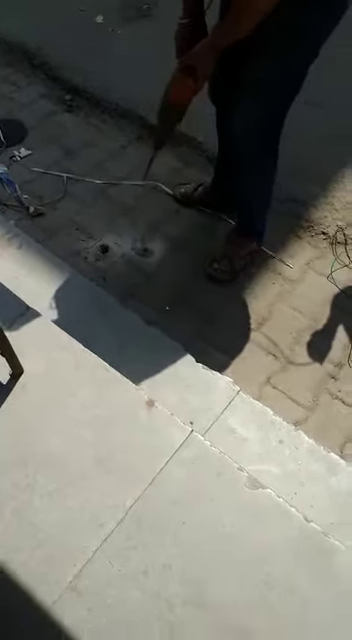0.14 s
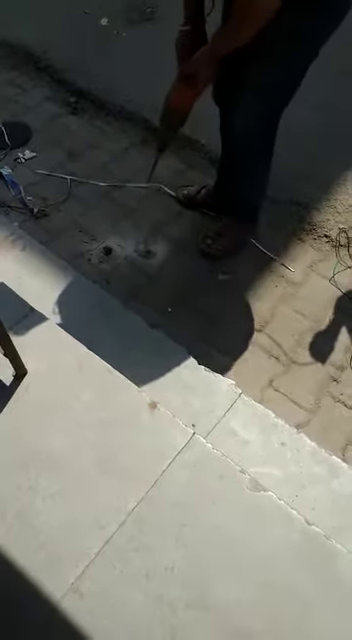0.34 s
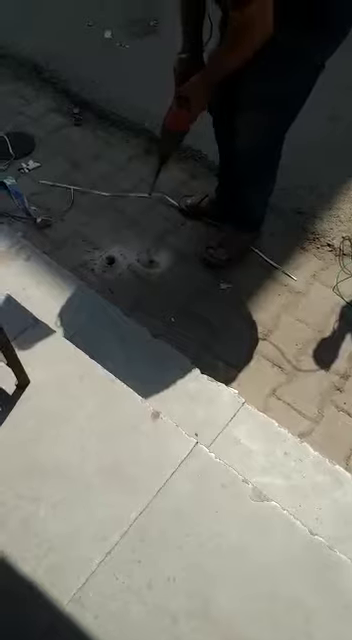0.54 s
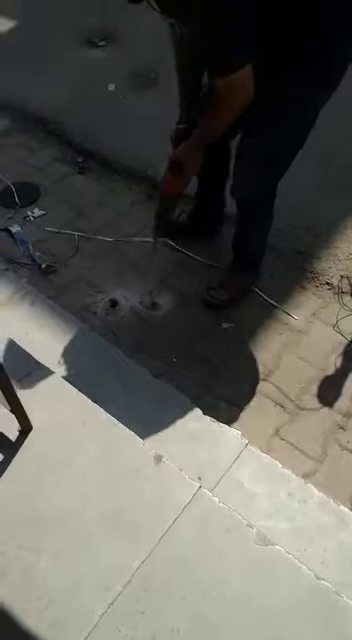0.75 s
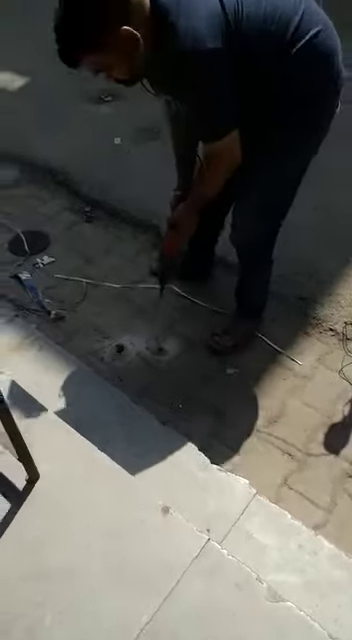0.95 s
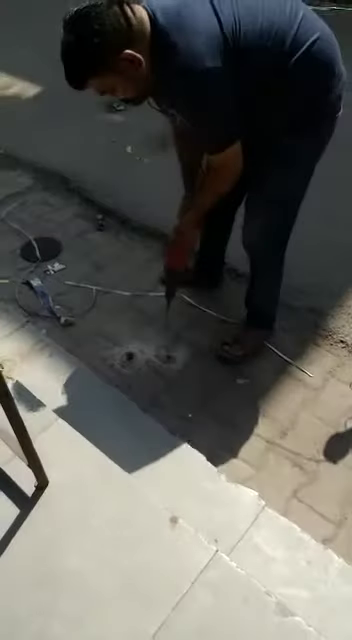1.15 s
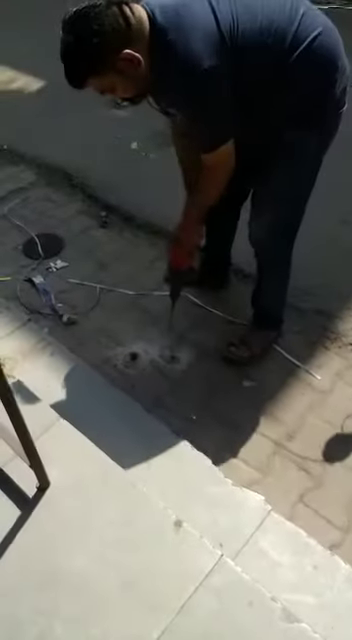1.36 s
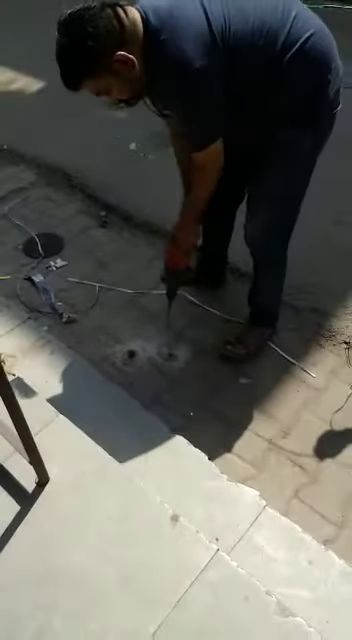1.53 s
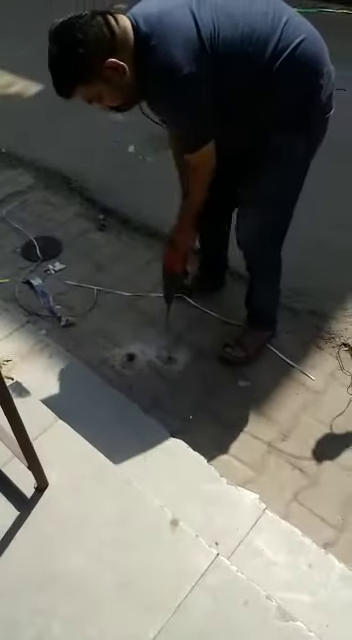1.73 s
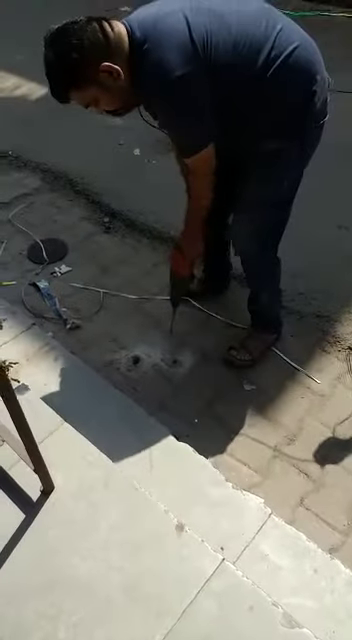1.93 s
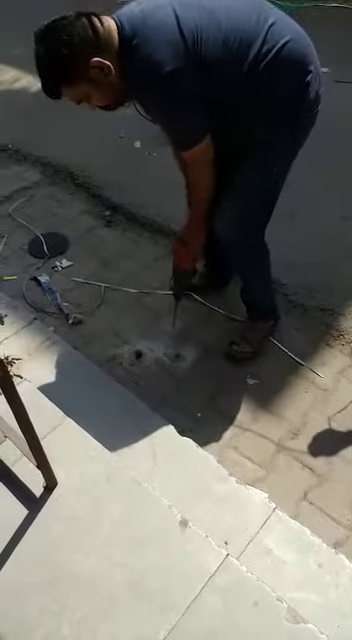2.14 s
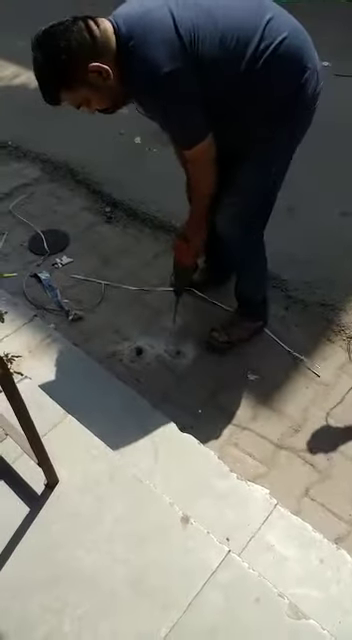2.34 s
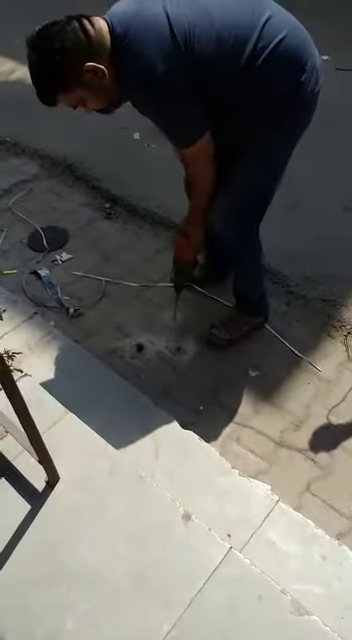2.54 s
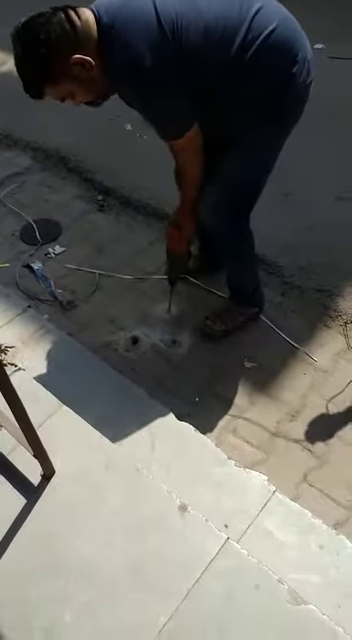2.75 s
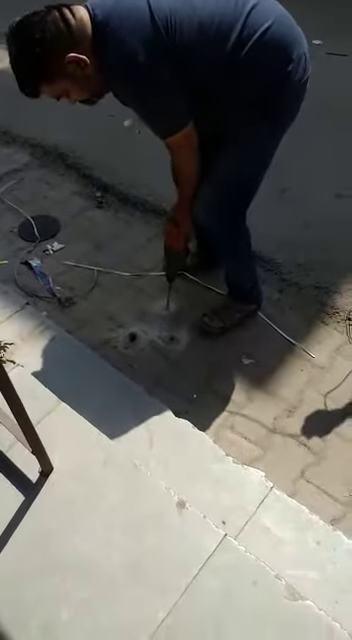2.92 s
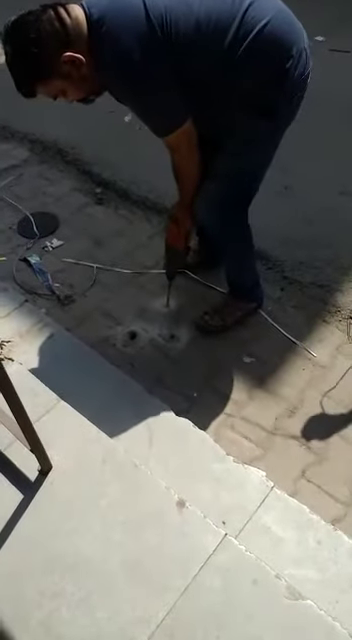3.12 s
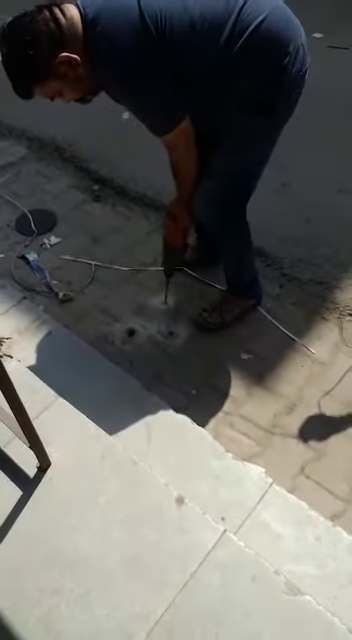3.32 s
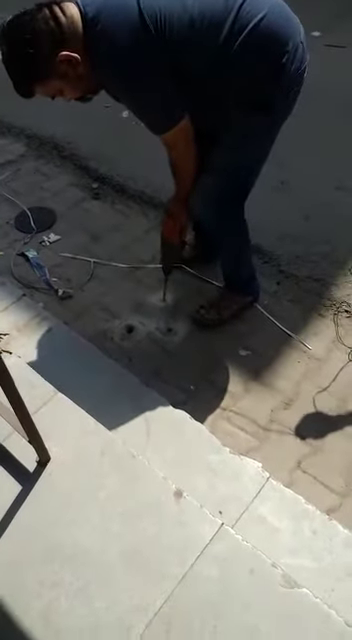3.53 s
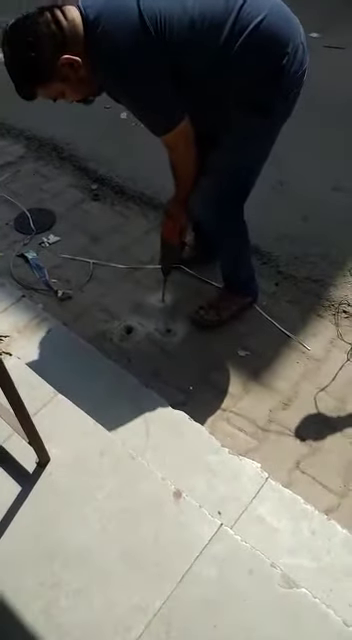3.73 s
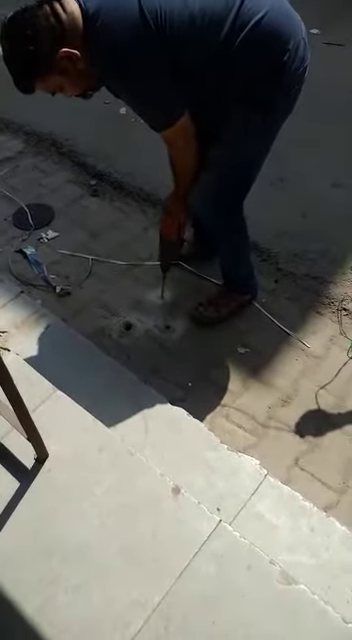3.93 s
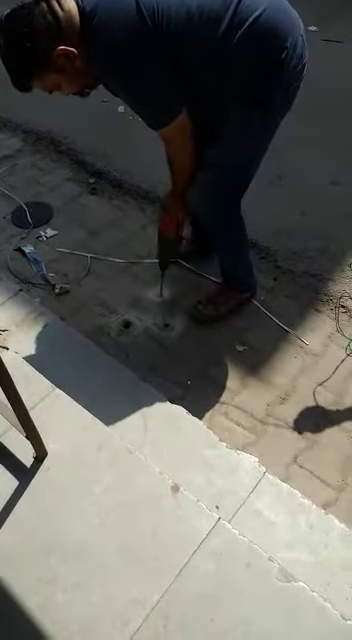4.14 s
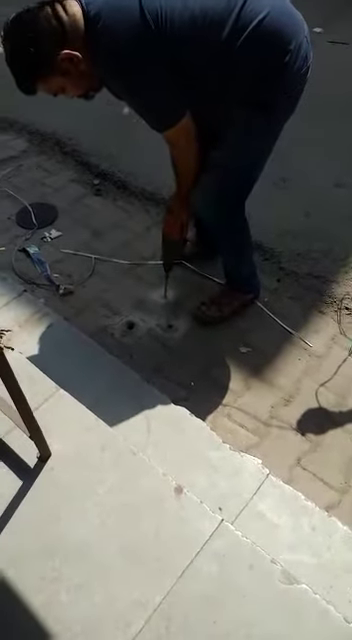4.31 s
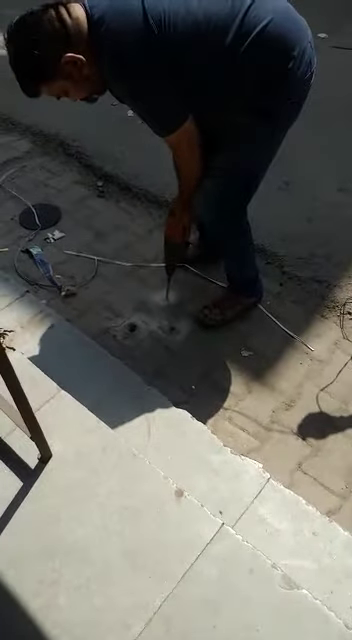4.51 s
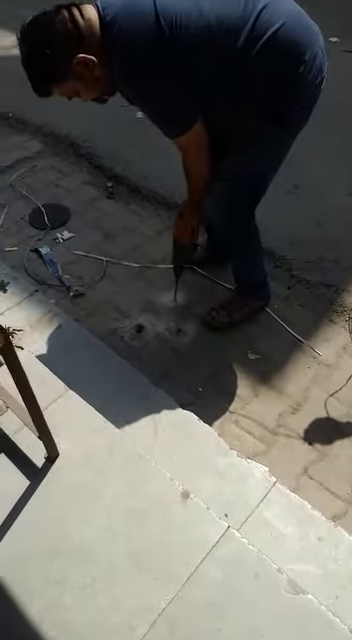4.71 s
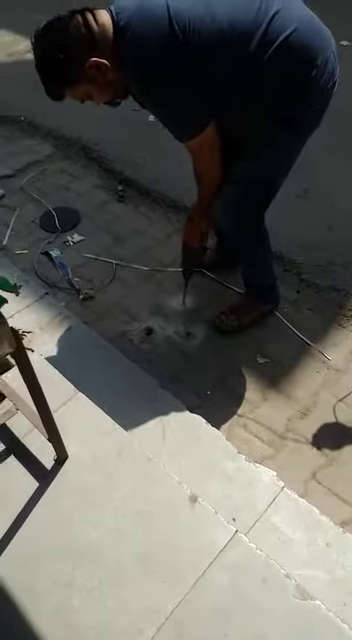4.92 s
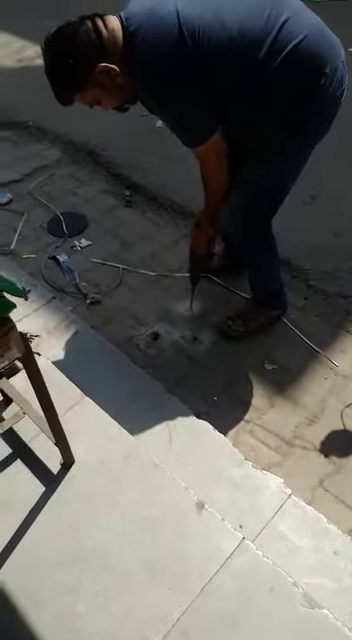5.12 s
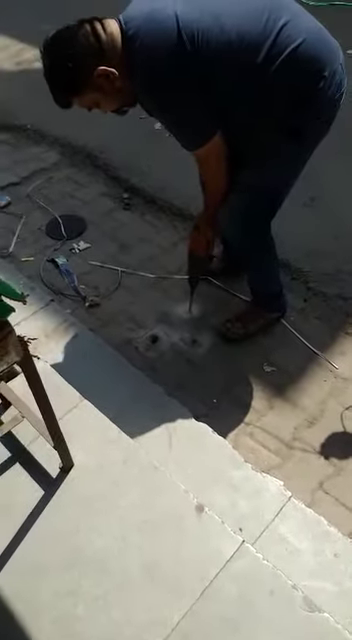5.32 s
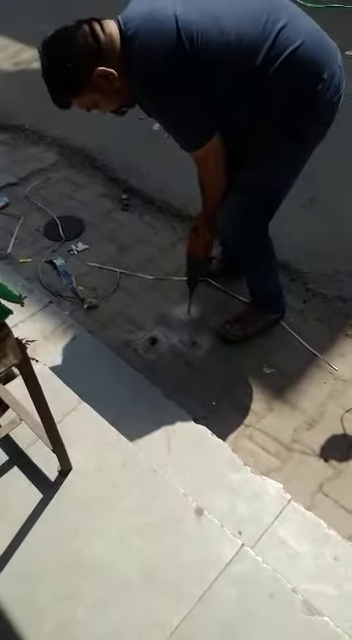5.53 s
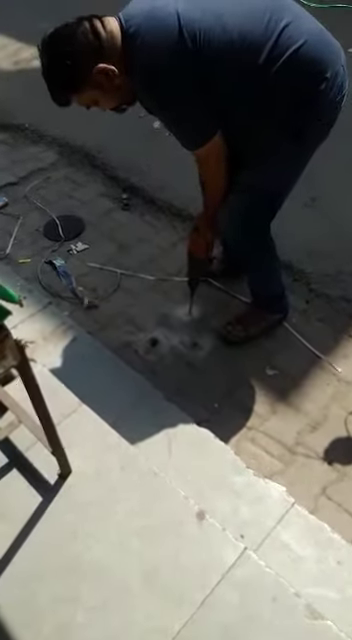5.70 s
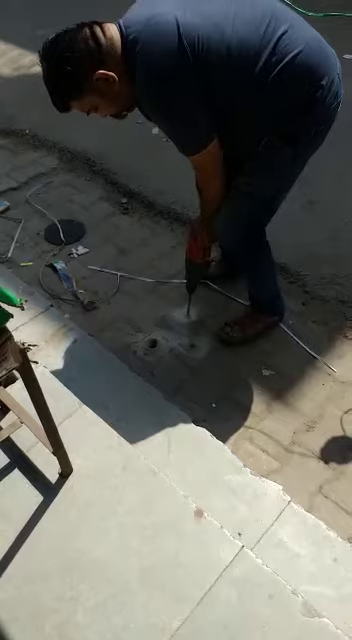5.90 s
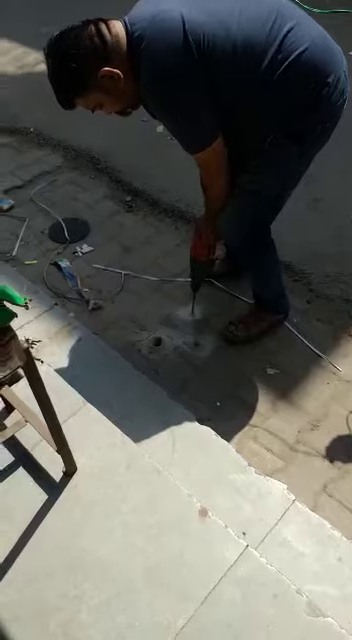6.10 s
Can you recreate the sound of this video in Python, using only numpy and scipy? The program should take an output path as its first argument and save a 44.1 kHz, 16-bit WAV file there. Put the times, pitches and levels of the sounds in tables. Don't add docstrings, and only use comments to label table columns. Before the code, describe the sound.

A loud rotary hammer winds down over about a second, its loose steel bit rattling brightly. Distant traffic hum swells in the lull. The bit clicks and scrapes on concrete, the motor surges with a sharp knock, then hammers in a fast, unbroken buzz with gear whine, low thumps and spitting chips. Outdoors beside a wall, phone a few metres away, its gain ducking the street under the tool.

```python
import sys
import numpy as np
from scipy import signal
from scipy.fft import rfft, irfft
from scipy.io import wavfile
from scipy.ndimage import uniform_filter1d

SR = 44100
rng = np.random.default_rng(int(sys.argv[2]) if len(sys.argv) > 2 else 0)


def unload_audio(sound):
    columns = np.transpose(np.atleast_2d(sound))
    steps = np.round(np.clip(columns, -1, 1) * 32767)
    wavfile.write(sys.argv[1], SR, steps.astype(np.int16))


def voltage_ratio(level):
    return 10 ** (np.asarray(level, float) / 20)


N = 276045
TIME = np.arange(N) / SR
TEETH = 21
PRESS_S, EASE_S, DEEP_S, CHANGE_S = 1.71, 3.5, 4.77, 0.12


def noise():
    return rng.standard_normal(N)


def shaped(x, spectrum):
    hz, level_db = np.transpose(spectrum)
    bins = np.arange(N // 2 + 1) * SR / N + 1
    gain = voltage_ratio(np.interp(np.log(bins), np.log(hz), level_db))
    y = irfft(rfft(x) * gain, N)
    return y / np.std(y)


def band(x, lo_hz, hi_hz):
    edges = [lo_hz, min(hi_hz, 0.45 * SR)]
    return signal.sosfilt(signal.butter(2, edges, "bandpass", fs=SR, output="sos"), x)


def resonate(envelope, modes):
    total = 0
    for hz, width_hz, level_db in modes:
        peak = signal.iirpeak(hz, hz / width_hz / 1.5, fs=SR)
        ring = signal.lfilter(*peak, signal.lfilter(*peak, envelope * noise()))
        total = total + voltage_ratio(level_db) * ring / np.std(ring)
    return total


def walk(rate_hz):
    hold = int(SR / rate_hz)
    levels = np.repeat(rng.standard_normal(N // hold + 1), hold)
    return uniform_filter1d(uniform_filter1d(levels, hold), hold)[:N]


def rise(at_s, over_s):
    return np.clip((TIME - at_s) / max(over_s, 0.001) + 0.5, 0, 1)


def curve(table):
    return np.interp(TIME, *np.transpose(table))


def bursts(turns, at, decay, scatter_db, jitter):
    chance = np.clip(rng.standard_normal((N // 400, 2)), -2, 2)
    turn = np.floor(turns - at).astype(int) + 1
    since = (turns - at) % 1 - jitter * np.abs(chance[turn, 0])
    size = voltage_ratio(np.clip(scatter_db, 0, 6) * chance[turn, 1])
    shape = np.where(since > 0, np.exp(-np.abs(since) / decay), 0) * size
    return shape / np.sqrt(np.mean(shape ** 2))


def orders(turns, lines, flicker_db, slip):
    total = 0
    for multiple, level_db in lines:
        phase = multiple * turns + rng.random() + slip * walk(20)
        total = total + voltage_ratio(level_db + flicker_db * walk(14)) * np.sin(2 * np.pi * phase)
    return np.sqrt(2) * total


# start_s, level_db
MOTOR_LEVEL = [(0, -19), (.16, -22), (.4, -26), (.45, -29.5), (.6, -30), (.82, -34.5), (1.27, -44),
               (1.41, -48), (1.47, -33), (1.54, -25), (1.63, -18), (1.7, -14), (1.97, -16.5), (2.8, -19),
               (4.6, -19), (4.96, -21), (5.9, -20.5), (6.26, -18.5)]


def motor_level():
    return curve(MOTOR_LEVEL)


# start_s, pitch_hz (second gear-mesh harmonic)
MOTOR_SPEED = [(1.85, 2510), (1.93, 2633), (2.09, 2769), (2.3, 2765), (2.64, 2752), (2.81, 2728),
               (2.98, 2686), (3.32, 2674), (3.66, 2762), (3.83, 2739), (4.0, 2753), (4.51, 2701),
               (4.68, 2706), (5.02, 2677), (5.36, 2661), (5.53, 2656), (5.7, 2640), (6.04, 2662)]


def motor_speed():
    return curve(MOTOR_SPEED)


# pitch_hz, level_db (per Hz)
ROAR_COLOUR = [(120, -37), (200, -14), (360, -24), (640, -14), (850, -9), (1340, -2.5), (2770, 1.5),
               (3800, 0.5), (5350, 6.5), (6600, -3.5), (8300, -20), (9800, -23), (12500, -11),
               (15700, -12.5)]
# pitch_hz, width_hz, level_db
HOUSING_MODES = [(1386, 56, -12), (2780, 370, -5), (4390, 82, -10.5), (1981, 30, -14)]


def roar(turns, share, motor_db):
    idle_db = np.maximum(0.5 + 0.3 * (motor_db + 18.5), -8.5)
    presence_db = idle_db + (3.0 - idle_db) * rise(1.7, 0.15)
    puff = share * bursts(turns, at=0.05, decay=0.14, scatter_db=1.5, jitter=0.05)
    fan = shaped(noise(), ROAR_COLOUR)
    brushes = shaped(noise(), ROAR_COLOUR)
    unit = np.std(band(fan, 1500, 2400))
    low = band(fan, 72, 2600) * voltage_ratio(0.84 * walk(12)) * np.sqrt(1 + 0.5 * puff ** 2)
    high = band(brushes, 4260, 19000) * voltage_ratio(presence_db - 6.5 + 1.02 * walk(8.1))
    high = high * np.sqrt(1 + 0.21 * puff ** 2)
    bottom = signal.butter(4, 1400, fs=SR, output="sos")
    treble = signal.butter(4, 11000, "highpass", fs=SR, output="sos")
    low = low - 0.47 * (1 - share) * signal.sosfiltfilt(bottom, low)
    high = high - 0.4 * (1 - share) * signal.sosfiltfilt(treble, high)
    housing = resonate(np.sqrt(1 + 0.22 * puff ** 2), HOUSING_MODES) * share * voltage_ratio(1.8 * walk(4.7))
    return voltage_ratio(motor_db - 3.0) * ((low + high) / unit + housing)


# start_s, level_db, length_s
BIT_JOLTS = [(0, -48, .06), (0.183, -43, .03), (.28, -51, .03), (0.368, -51, 0.027), (.47, -54, 0.028),
             (.53, -47, .02), (1.28, -48, .02), (1.31, -53, .03), (1.335, -56, .02), (2.845, -29, .015),
             (4.21, -36, .02), (4.679, -36, 0.029)]


def ring_gain(motor_db):
    rattle = voltage_ratio(-51 - 10 * TIME) * (1 - rise(0.56, 0.02))
    jolts = 0
    for start_s, level_db, length_s in BIT_JOLTS:
        jolts = jolts + voltage_ratio(level_db) * rise(start_s, 0.003) * np.exp(-np.abs(TIME - start_s) / length_s)
    blows = voltage_ratio(-28 - 3.6 * (TIME - PRESS_S) + 1.6 * walk(7.5)) * rise(PRESS_S, 0.04)
    return voltage_ratio(motor_db - 52) + rattle + jolts + blows


def freedom_db():
    free_db, held_db, eased_db = 4.5, -5.5, 0.1
    eased = rise(EASE_S, CHANGE_S) - rise(DEEP_S, CHANGE_S)
    return free_db + (held_db - free_db) * rise(PRESS_S, CHANGE_S) + (eased_db - held_db) * eased


# pitch_hz, width_hz, level_db
BIT_MODES = [(13230, 280, 0), (12700, 350, -8), (9020, 140, -12)]
# pitch_hz, width_hz, level_db
SHANK_MODES = [(13080, 650, 1), (15000, 2400, -2), (5560, 450, 8)]


def bit(turns, share, motor_db):
    blow = bursts(turns, at=0.1, decay=0.13, scatter_db=4.0, jitter=0.06)
    rebound = bursts(turns, at=0.6, decay=0.13, scatter_db=4.5, jitter=0.1)
    grit = 0.55 * voltage_ratio(2.5 * walk(150))
    knocks = blow + 0.6 * rebound + grit
    ringing = resonate(knocks, BIT_MODES) * voltage_ratio(freedom_db()) + share * resonate(knocks, SHANK_MODES)
    return voltage_ratio(1.0) * ring_gain(motor_db) * ringing


def ducked_db(motor_db):
    keep = np.exp(-1 / (0.9 * SR))
    push_db = 0.48 * np.maximum(motor_db + 39.5, 0)
    duck_db = signal.lfilter([1 - keep], [1, -keep], push_db, zi=[3.5])[0]
    return -36.5 - duck_db - 0.7 * np.maximum(TIME - PRESS_S, 0)


# pitch_hz, level_db (per Hz)
STREET_COLOUR = [(24, -33), (40, -6.5), (140, 0.5), (318, -10), (389, -6), (512, -10.5), (566, -7),
                 (844, -6.5), (909, -13.5), (1140, -7), (2940, -17.5), (5100, -18), (6230, -19),
                 (8620, -47), (15700, -61)]


def street(motor_db):
    hum = shaped(noise(), STREET_COLOUR) * voltage_ratio(0.21 * walk(4.7))
    return voltage_ratio(ducked_db(motor_db)) * hum / np.std(band(hum, 50, 170))


# start_s, level_db (peak), pitch_hz (centre), width_hz, decay_s
TIP_TICKS = [
    (.891, -30, 14000, 8000, 0.0025),
    (1.639, -4, 4870, 1200, 0.033),
    (1.28, -26, 5300, 900, 0.0086),
    (1.3, -16, 3800, 4600, .003),
    (1.302, -21.5, 4500, 3000, 0.025),
    (1.32, -30, 4200, 4000, .001),
    (1.331, -38, 8000, 10000, 0.0015),
    (1.301, -38, 11000, 9000, .002),
]


def ticks():
    out, t = np.zeros(N), np.arange(2048) / SR
    for start_s, level_db, pitch_hz, width_hz, decay_s in TIP_TICKS:
        edges = pitch_hz - width_hz / 2, pitch_hz + width_hz / 2
        scrape = rng.standard_normal(2048) * np.exp(-t / decay_s)
        click = band(band(scrape, *edges), *edges)
        start = int(start_s * SR)
        out[start:start + 2048] += voltage_ratio(level_db) * click / np.max(np.abs(click))
    return out


# middle_s, half_length_s, pitch_hz, level_db
FAR_HUMS = [
    (1.12, .12, 2780, -52),
    (1.45, .18, 642, -45),
]


def far_tones():
    total = 0
    for middle_s, half_s, pitch_hz, level_db in FAR_HUMS:
        swell = voltage_ratio(level_db + 2 * walk(15.3)) * np.exp(-((TIME - middle_s) / half_s) ** 4)
        total = total + swell * np.sin(2 * np.pi * (pitch_hz * TIME + 0.1 * walk(14)))
    return total


SLAB_THUMP = {2: -55, 3: -54, 4: -48, 5: -48, 6: -49, 7: -50.5, 8: -51, 9: -49, 11: -53}


def slab(turns, share):
    bite = np.exp(-np.abs(TIME - 1.8) / 0.53)
    crunch = voltage_ratio(-32.5) * bite * resonate(1.0, [(290, 110, 0)])
    thump = orders(turns, list(SLAB_THUMP.items()), flicker_db=-3.0, slip=0.027)
    return share * (voltage_ratio(8.0 * bite) * thump + crunch)


def chips(share):
    count = int(35 * N / SR)
    at, size = rng.random((count, 2)).T
    hits = np.zeros(N)
    hits[(at * N).astype(int)] = voltage_ratio(-4 * np.log(size + 0.01))
    tail = signal.lfilter([1], [1, -np.exp(-1 / (0.0012 * SR))], hits)
    spit = band(band(tail * noise(), 12000, 17000), 12000, 17000)
    return voltage_ratio(-26) * share * spit


# multiple of the blow rate, level_db, slope_db (per 100 Hz of speed), deep_db (change when deep)
MESH_LINES = [(42, -22.5, 0.5, -11), (21, -33.5, -10.5, -1.5), (40, -31.5, 18, 7.5), (19, -41.5, -3.5, 6)]
GEAR_SIDEBANDS = {13: -43, 16: -41, 20: -38, 23: -38, 36: -38, 43: -34, 44: -32, 45: -34, 47: -39, 63: -41,
                  84: -33, 87: -35}


def gears(turns, second_hz):
    off = np.clip(second_hz - 2728, -49.7, 49.7) / 100
    mesh = []
    for multiple, level_db, slope_db, deep_db in MESH_LINES:
        mesh.append((np.round(multiple), level_db + slope_db * off + deep_db * rise(DEEP_S, CHANGE_S)))
    steady = orders(turns, mesh, flicker_db=2.4, slip=0.025)
    steady = steady * (1 + 0.35 * np.cos(4 * np.pi * turns + walk(30)))
    sidebands = orders(turns, list(GEAR_SIDEBANDS.items()), flicker_db=3.0, slip=0.04)
    return rise(1.835, 0.17) * (steady + sidebands)


def scene():
    motor_db, second_hz = motor_level(), motor_speed()
    turns = np.cumsum(second_hz / (2 * TEETH)) / SR
    share = rise(1.66, 0.17)
    tool = roar(turns, share, motor_db) + bit(turns, share, motor_db)
    tool = tool + ticks() + slab(turns, share) + chips(share)
    wall = 0.24 * np.roll(tool, int(0.011 * SR))
    mix = tool + wall + gears(turns, second_hz) + street(motor_db) + far_tones()
    return mix[None]


def roll_off(x):
    return signal.sosfilt(signal.butter(12, 16870, fs=SR, output="sos"), x)


def record(dry):
    hiss = voltage_ratio(-68) * band(noise(), 9500, 17000)
    bass = signal.butter(7, 52, "highpass", fs=SR, output="sos")
    top = signal.ellip(14, 0.3, 80, 15760, fs=SR, output="sos")
    rounded = 0.9 * np.tanh((dry + hiss) / 0.9)
    return roll_off(signal.sosfilt(np.vstack([bass, top]), rounded))


dry = scene()
out = record(dry)
unload_audio(out)
```